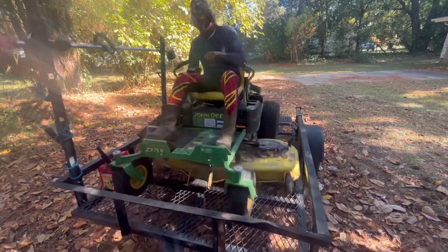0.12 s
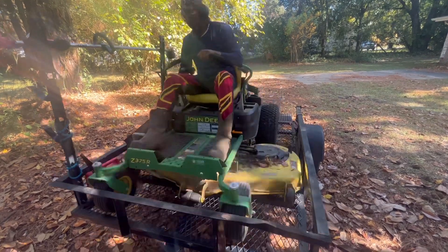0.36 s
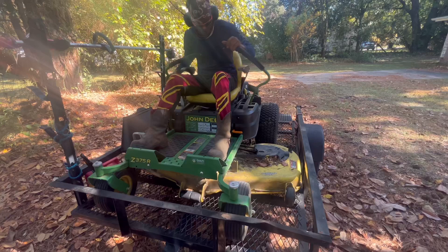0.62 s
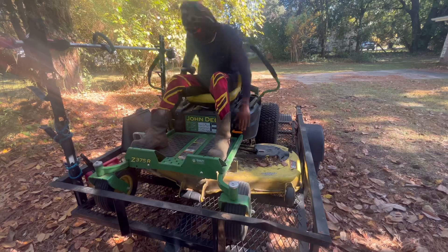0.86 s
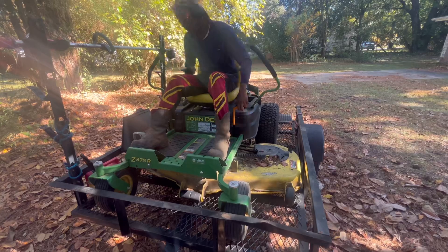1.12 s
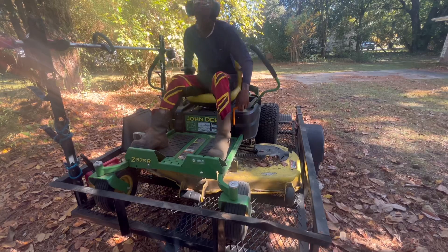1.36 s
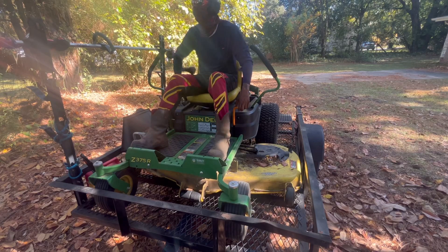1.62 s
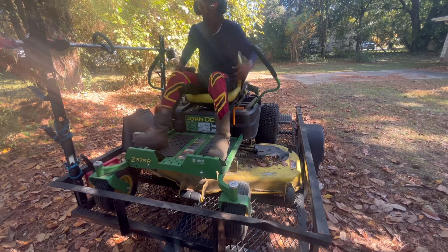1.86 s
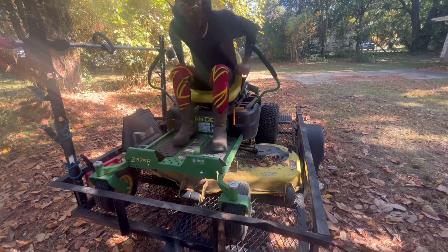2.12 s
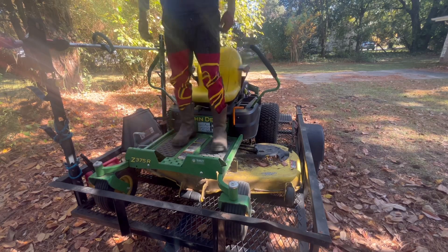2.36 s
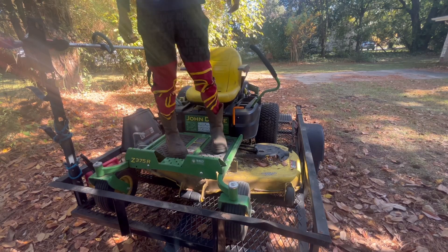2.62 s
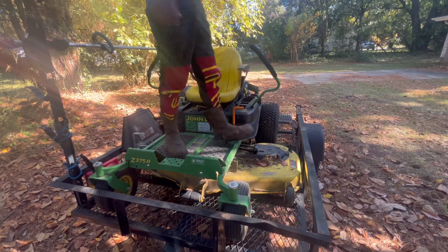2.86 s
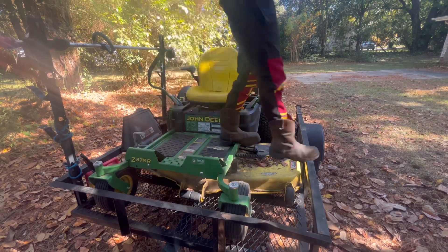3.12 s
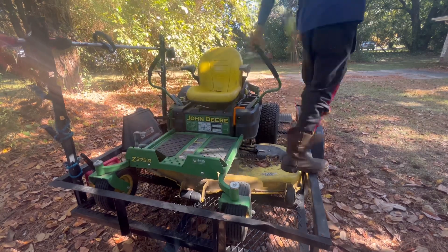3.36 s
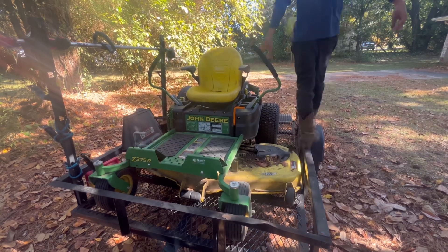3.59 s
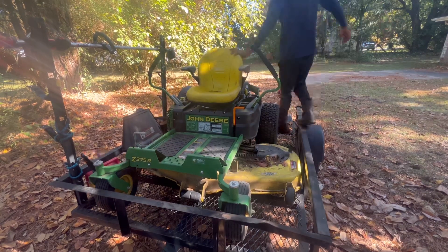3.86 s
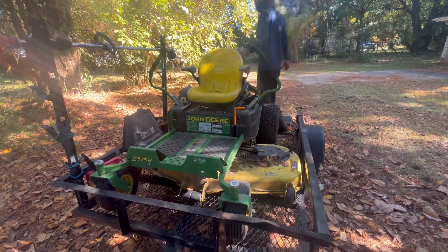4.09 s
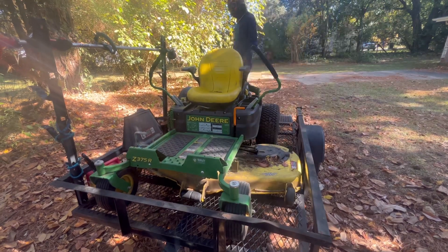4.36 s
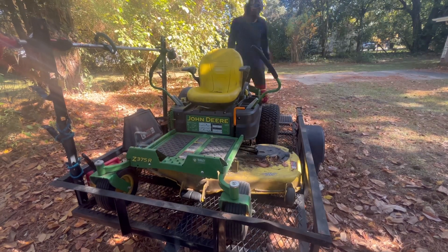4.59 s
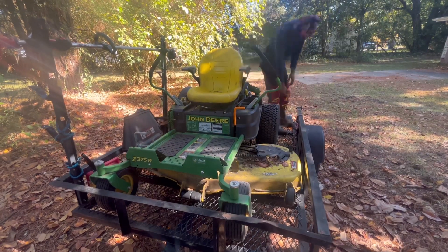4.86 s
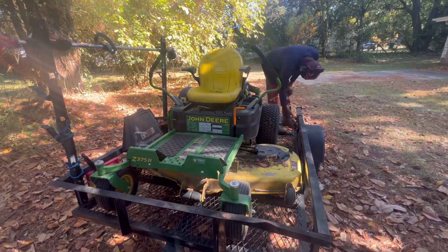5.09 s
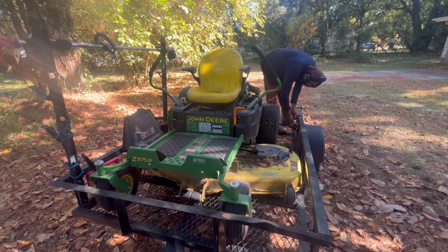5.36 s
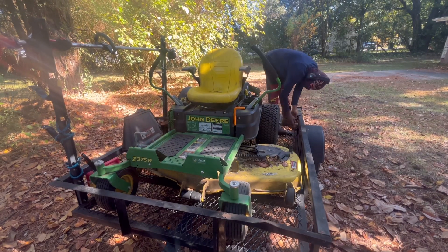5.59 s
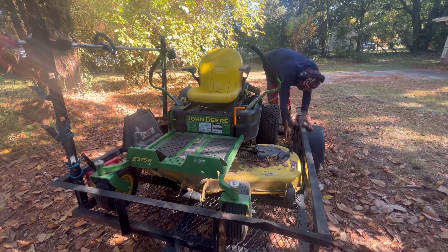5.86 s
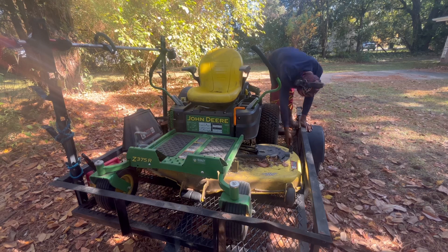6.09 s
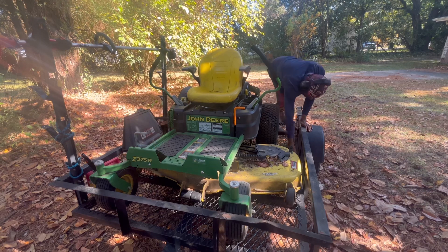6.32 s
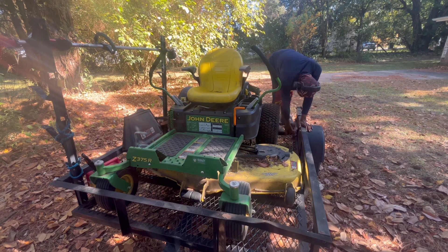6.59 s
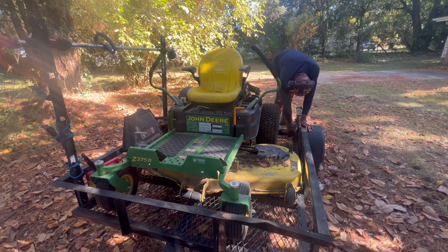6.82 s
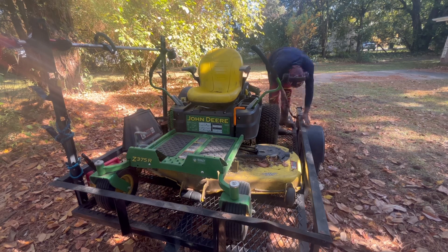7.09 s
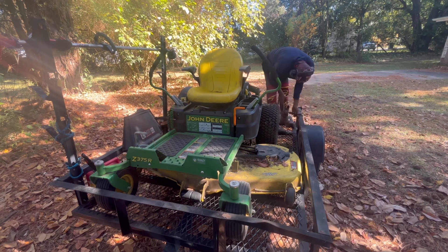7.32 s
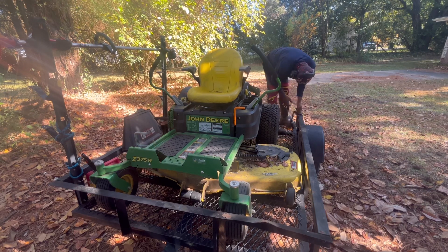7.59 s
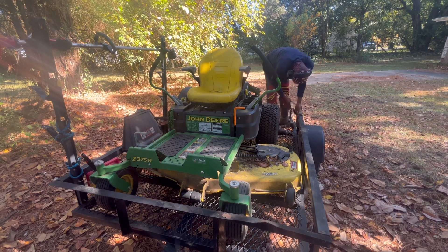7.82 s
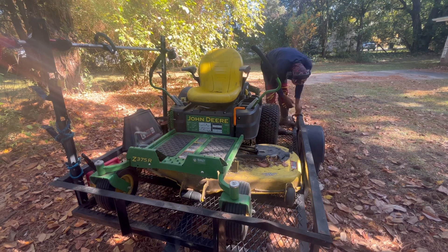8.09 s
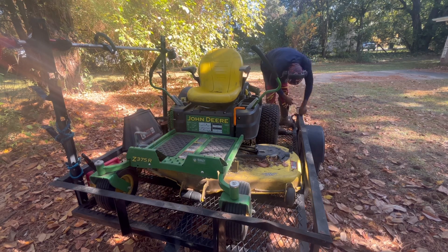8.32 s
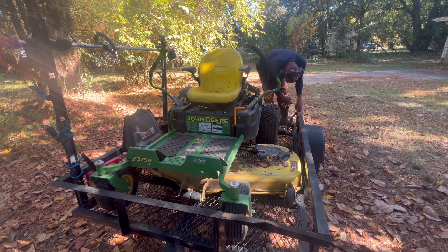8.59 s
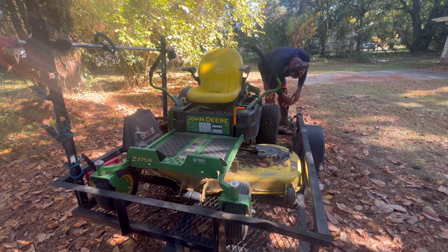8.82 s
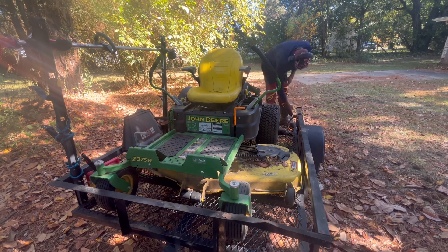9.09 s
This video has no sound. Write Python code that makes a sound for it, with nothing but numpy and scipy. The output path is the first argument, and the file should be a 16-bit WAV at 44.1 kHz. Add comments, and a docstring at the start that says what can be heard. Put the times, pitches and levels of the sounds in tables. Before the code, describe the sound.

Close outdoor stereo pickup in a yard. From 0 to about 1.3 s a mower engine holds a steady, rough buzzing drone near 96 pulses per second, with whining overtones, broadband roar and panel rattle. It is cut at 1.3 s: the pitch falls quickly, breaking by 2 s into separate uneven chugs with loose metallic chatter, stopping around 2.3 s. A quiet gap holds a few faint knocks. From 3.2 to 5.1 s boots climb down over steel: scuffs, hollow low thumps, mesh knocks, tiny rubber squeaks, the hardest bright clanks near 3.95 s, a dull echo tail behind. From 5.1 to 7.5 s only sparse, soft scrapes and ticks. A sharper clink cluster comes at 7.6 s. Faint distant traffic and leaf hiss rise after 7.8 s, a far engine passes with sinking pitch, and one bright clink rings near 9.2 s.

```python
"""In a yard, close by two microphone ports, a ride-on mower stands on a steel mesh trailer. Its engine whines in
multiples of a pulse rate over a noise roar, is switched off and coasts down in ever slower puffs through resonances.
The driver climbs off: boots, strap and hooks scuff, knock and squeak as noise bursts ringing the steel, short blows
and unsteady tones, while the trailer frame booms. Far off, shaped noise makes traffic and leaves swell, a far engine
passes in a few sinking tones, and a dull echo tail answers the trailer."""
import sys
import numpy as np
from scipy import signal
from scipy.fft import rfft, irfft, next_fast_len
from scipy.io import wavfile
from scipy.ndimage import uniform_filter1d, map_coordinates

SR = 44100
rng = np.random.default_rng(int(sys.argv[2]) if len(sys.argv) > 2 else 0)


def wav_record(signal):
    """Record a signal, one row per channel, as 16-bit PCM in the file named by sys.argv[1]."""
    frames = np.transpose(np.atleast_2d(signal))
    bounded = np.clip(frames, -1, 1)
    # unit amplitude maps onto the largest positive 16-bit level
    quanta = np.round(bounded * 32767).astype(np.int16)
    wavfile.write(sys.argv[1], SR, quanta)


def elevation(decibels):
    """Turn decibel levels (scalar or array-like) into linear amplitude ratios."""
    levels = np.asarray(decibels, float)
    return 10 ** (levels / 20)


N = 405719
T = np.arange(N) / SR  # seconds

# Far yard. Each row: time in seconds, traffic level in dB, leaves level in dB.
YARD_LEVELS = [(2.4, -48.5, -53), (3.08, -48, -50.5), (3.6, -53, -57), (4.25, -50.5, -56.5),
               (4.7, -56, -60), (6.2, -56.5, -62.5), (6.55, -53.5, -60), (7.4, -55, -55),
               (7.8, -47.5, -50.5), (8.2, -49, -47), (8.69, -42, -42), (9.2, -40, -42)]
# Spectra of far traffic, leaves and the finest hiss under them. Each row: frequency in Hz, level in dB per Hz.
TRAFFIC_SPECTRUM = [(18, -77.5), (30, -57), (59, -40), (136, -12.5), (171, -8), (202, -0.5), (305, -3.5),
                    (660, -16), (929, -18), (1240, -23), (2200, -30.5), (2860, -54), (4840, -120)]
LEAVES_SPECTRUM = [(900, -30.5), (1600, -25), (2100, -13.5), (3300, -1.5), (4600, -2.5), (7000, -10.5),
                   (9500, -19.5), (13000, -40)]
FINE_SPECTRUM = [(5000, -29.5), (8000, -12.5), (12000, -4), (15500, -3)]
FINE_DB = -14  # over the leaves
# A far engine passes, its pitch sinking. Each row: time in seconds, pulse rate in Hz, levels in dB of the
# third, fourth and sixth multiple.
PASSING_ENGINE = [(7.4, 51.5, -62, -69.5, -58), (7.9, 51.3, -55, -63, -51), (8.4, 51, -54, -56, -60),
                  (8.7, 50.6, -47, -46, -46), (9.0, 49.25, -49, -41, -50), (9.2, 48.3, -49, -44.5, -59.5)]
# Trees and walls answer the trailer.
ECHO_DB, ECHO_T60_S, ECHO_GAP_S = -21, 0.51, 0.03

# The frame booms under shifting weight. Each row: start in seconds, level in dB, 60 dB decay in seconds.
BOOMS = [(2.612, -48, 0.17), (2.691, -53, 0.26), (3.238, -29, 0.14), (3.28, -30, 0.15), (3.389, -43, 0.13),
         (3.569, -46, 0.64), (3.648, -49, 0.17), (3.738, -39.5, 0.29), (3.91, -29.5, 0.25),
         (3.944, -34.5, 0.59), (4.061, -32, 0.46), (4.105, -43, 0.25), (4.235, -31, 0.23),
         (4.397, -30.5, 0.19), (4.638, -46.5, 0.56), (4.791, -40, 0.14), (4.818, -37, 0.33),
         (4.91, -30.5, 0.19), (4.95, -41.5, 0.18), (4.992, -52, 0.27), (5.699, -52, 0.084),
         (5.906, -48.5, 0.18), (6.447, -42, 0.42), (6.675, -42.5, 0.07), (7.598, -43, 0.52)]
PUSH_S = 0.014  # rise of a push
# Resonances of frame, mesh and steel. Each row: frequency in Hz, width in Hz, relative level in dB.
FRAME_MODES = [(209, 36, -4), (250, 22.6, 7), (307.4, 12.7, 2.5), (380, 23.5, 3.5), (490, 31, -10),
               (537, 36, -2.5)]
MESH_MODES = [(600, 270, 2.5), (825, 35, 6), (913, 38, 4.5), (1038, 51, -1.5), (1115, 206, -5.5)]
STEEL_MODES = [(1870, 1100, 0.5), (2654, 170, 5), (3110, 250, 7), (3510, 91, 9.5), (3760, 130, 9),
               (4680, 600, 2.5), (5670, 680, -1), (7410, 420, -2), (8740, 210, -1.5)]
# Spectrum of the rasp on the steel. Each row: frequency in Hz, level in dB per Hz.
RASP_SPECTRUM = [(4500, -11), (7000, 2.5), (10000, 0.5), (14000, 3), (16500, 7.5)]
# Rubbing touches. Each row: start in seconds, clank in dB, knock over clank in dB, rasp over clank in dB,
# slide in seconds.
SCUFFS = [(3.2444, -56, -12, -27, .016), (3.3014, -49, -1, 2.5, 0.031), (3.389, -60, 18, -3, .003),
          (3.4307, -48, -12, 10, 0.017), (3.567, -46.5, -6, 3, 0.0092), (3.636, -45.5, 0, 3.5, 0.013),
          (3.743, -50, 2, -30, 0.0067), (3.905, -48.5, 9.5, 1.5, 0.022), (3.9944, -41, -4, -3.5, 0.012),
          (4.056, -51, 7.5, 3, 0.023), (4.13, -51.5, -11, 1, .013), (4.228, -44, 4.5, -1, 0.025),
          (4.2894, -61, -19, -18, .011), (4.381, -43, 4.5, -5, 0.018), (4.6687, -54, 0, 7, 0.017),
          (4.786, -58, 10.5, -5, 0.025), (4.895, -50, 4.5, -0.5, 0.02), (4.996, -58, -12, -24, 0.011),
          (5.105, -74.5, -19.5, 7.5, 0.13), (5.2465, -61.5, -17, 8.5, 0.032),
          (5.5618, -58.5, -11, -1, 0.038), (5.619, -71, -11, 5.5, 0.064), (5.9094, -70, -16, 1, 0.018),
          (6.3894, -68, -9, 6, 0.02), (6.52, -62.5, -13, 11, 0.013), (6.5435, -59.5, -6, 7, 0.023),
          (6.856, -62.5, 4.5, 9.5, 0.015), (7.6094, -49.5, 0, -14, 0.015), (7.7394, -65, -30, 13.5, 0.022)]
SCUFF_T60_S = 0.056  # base decay, which steel() stretches for each layer
# Sharp blows. Each row: start in seconds, clank in dB, knock over clank in dB, rasp over clank in dB,
# base decay in seconds, which steel() stretches for each layer.
KNOCKS = [(1.897, -40, -15, 10, 0.055), (2.005, -42, 12.5, -10, 0.068), (2.026, -43, -11, 13.5, 0.049),
          (2.533, -52, 3.5, 0, 0.2), (2.659, -50.5, 1.5, 2, 0.45), (3.2325, -32, -1.5, -16, 0.045),
          (3.274, -43.5, 11.5, -20, 0.043), (3.6056, -39, -6, -15, 0.043), (3.643, -45, 1, -4, .04),
          (3.8843, -51, -1, 2.5, 0.24), (3.937, -29, -22, -4.5, 0.15), (3.9693, -23.5, -8, -1.5, 0.05),
          (3.9832, -27, -12, -14, 0.016), (4.108, -48, 6, 0, .11), (4.182, -44, -7, -6.5, 0.18),
          (4.2084, -46, -12, -4, 0.6), (4.243, -58.5, 18, -20, .1), (4.268, -66, 11, -20, 0.046),
          (4.392, -55.5, 10, -20, 0.085), (4.418, -64.5, 15, -20, 0.071), (4.9437, -52.5, -1, -3, 0.16),
          (5.0724, -55.5, -14, 3, 0.18), (6.316, -57, -17, -2, 0.095), (6.358, -63, -19, 18.5, .14),
          (6.461, -66, 13, -3, 0.14), (6.675, -54.5, 0.5, 14, 0.11), (6.69, -72.5, 10, -10, 0.1),
          (6.831, -51, -28, 17.5, 0.16), (7.541, -51.5, 1, 18.5, 0.13), (7.5806, -39.5, -14, 16.5, 0.12),
          (7.591, -60, 15.5, -20, 0.11), (9.179, -45, -10, 14.5, 0.54)]
STRIKE_DB = 14  # the single first contact over the level of the ringing
CRACK_DB, CRACK_T60_S = -10, 0.018  # first crack: level over the ringing blow, base decay
# Rubber squeals on steel. Each row: start in seconds, length in seconds, pitch in Hz, level in dB,
# step from overtone to overtone in dB, overtones under the first in dB.
SQUEALS = [(3.299, 0.012, 2540, -34.5, -1, 6.5), (3.433, 0.024, 895, -38.5, -0.04, 15),
           (3.563, 0.012, 902, -43, -0.06, 13), (3.644, 0.011, 886, -40, 0, 14)]
# Metal ringing or settling. Each row: start in seconds, length in seconds, pitch in Hz, level in dB.
METAL_TONES = [(2.366, 0.01, 1150, -46), (2.378, 0.27, 234, -50.5), (2.71, 0.13, 1180, -57),
               (3.081, 0.00085, 1576, -36), (3.233, 0.0017, 1010, -29.5), (3.275, 0.0045, 990, -32.5),
               (3.44, .025, 1560, -51), (3.565, .006, 3800, -43), (3.605, 0.003, 3280, -37),
               (3.607, 0.016, 1223, -45), (3.655, .008, 3650, -54), (3.967, 0.027, 3720, -44),
               (4.176, .008, 3060, -41.5), (4.218, .02, 3300, -40), (4.277, 0.013, 3100, -43),
               (4.387, .01, 3510, -46), (4.687, 0.039, 3100, -55), (4.903, .006, 3440, -44),
               (4.992, 0.08, 247, -45.5), (5.072, .025, 5350, -55.5), (7.59, 0.0086, 585, -44),
               (7.624, 0.012, 540, -39.5), (7.645, .012, 545, -42)]

# A loose bracket chatters as the machine shudders to rest. Each row: time in seconds, level in dB.
CHATTER = [(1.9, -60), (2.04, -42), (2.07, -41), (2.14, -41), (2.25, -43), (2.31, -47), (2.35, -56),
           (2.4, -90)]
# Its ring. Each row: frequency in Hz, width in Hz, relative level in dB.
BRACKET_MODES = [(2617, 130, 0), (1460, 200, -4)]

# The shaft, governed and then coasting. Each row: time in seconds, pulse rate in Hz.
SPEED = [(0, 96.35), (.6, 97.1), (1.275, 96.37), (1.35, 88.8), (1.444, 81.2), (1.608, 74.5), (1.652, 68.77),
         (1.776, 53.55), (1.852, 45.9), (2.0, 32.54), (2.094, 28.2), (2.16, 24.8), (2.36, 21.16)]
HUNT = 0.001  # share by which the governor lets the speed wander
OFF_S, FADE_S = 1.276, 2.258  # the ignition is cut; the coasting layers begin to fade
FADE_DB_S = 93.5  # how fast the coasting layers fall silent once they begin to fade
# Whine while firing, then without firing. Each row: multiple of the pulse rate, level in dB.
WHINE = [(1, -30), (2, -4), (3, -2), (4, -14), (5, -9), (6, -13), (7, -19), (8, 0), (9, -8), (10, -1),
         (11, -3), (12, -8), (13, -13.5), (14, -15), (16, -13), (18, -20), (19, -13), (20, -17), (21, -13),
         (22, -16), (24, -20), (27, -20), (30, -18), (32, -15.5), (33, -21), (34, -19), (35, -21),
         (36, -17), (37, -21), (39, -21), (41, -18), (44, -23)]
COAST = [(2, -4), (4, -23), (5, -10.5), (6, -9.5), (7, -13), (8, -5.5), (9, -21), (10, -8.5), (11, -6),
         (12, -8), (13, -7), (14, -9.5), (15, -13)]
WHINE_DB, WHINE_DIES_DB_S = -22, 700  # while firing; fall after the cut
COAST_DB, COAST_GROWS = -25, 1.8  # coasting whine at full speed; dB gained per dB of speed
# Two lists, for the fortieth and forty-eighth multiple drifting in and out. Each row: time in seconds, level in dB.
DRIFTING = [(0, -11), (.3, -12), (.5, -16), (1.05, -15), (1.15, -13), (1.3, -17)], [(0, -21), (.3, -17),
            (.4, -10), (.58, -10), (.65, -20), (1.3, -22)]
# How ragged the multiples are, worst just after the cut. Each row: time in seconds, extra waver in dB.
RAGGED = [(1.275, 0), (1.3, 4), (1.43, 3.5), (1.48, .7), (1.7, .9), (1.9, 2)]
TWIN_GAP, TWIN_SIZE = 0.385, 0.93  # second burst of each period: share of the period, size over the first
SWEEP = 0.014  # each burst sweeps upward: phase lag in turns per squared multiple
# The third multiple booms while it slides through this resonance, and kicks once as the ignition is cut.
BOOM_HZ, BOOM_WIDTH_HZ, BOOM_DB = 213.5, 44, -16.5
KICK_DB, KICK_DIES_DB_S = -16.5, 151
# Puffs within one pulse period. Each row: share of the period, level in dB.
PUFFS = [(0, -1), (.39, 1), (0.741, 0.5)]
PUFF_FIRING_DB, PUFF_DB, PUFF_GROWS = -48, -22, 0.48  # firing; coasting; dB gained per dB of speed
# The last uneven chugs, once the shaft no longer turns smoothly. Each row: time in seconds, pulse strength in dB.
CHUGS = [(1.958, 4), (1.974, 8), (1.987, 7), (2.005, -2), (2.019, 6), (2.036, 3), (2.053, 4.5),
         (2.069, 6.5), (2.090, 3.5), (2.108, -3), (2.132, 3.5), (2.150, 4), (2.166, 1), (2.18, 1.5),
         (2.200, 0), (2.221, -4), (2.236, 2.5), (2.262, -2.5), (2.289, -3.5), (2.311, -4), (2.321, -8),
         (2.358, -8)]
# Resonances of the exhaust pipe, of the rattling panels, and of loose parts that each puff jolts.
# Each row: frequency in Hz, width in Hz, relative level in dB.
PIPE_MODES = [(223, 52, 0), (345, 60, 1.5), (640, 150, -6.5), (843, 220, -4.5), (1150, 170, -5.5)]
PANEL_MODES = [(1515, 280, 1.5), (2520, 590, -4), (2920, 130, 0.5), (3376, 140, 0), (3940, 300, 0.5),
               (4640, 240, -3), (5980, 200, -1.5), (7180, 220, -0.5)]
LOOSE_MODES = [(752, 230, -1), (1102, 250, 0), (1470, 190, 2.5), (1980, 400, -2), (2650, 110, 1.5),
               (3030, 220, 0), (3720, 190, -3), (4430, 500, -12)]
JOLT_BELOW_HZ = 45  # puffs faster than this jolt the loose parts less
# Spectrum of the roar. Each row: frequency in Hz, level in dB per Hz.
ROAR_SPECTRUM = [(35, -64), (60, -29), (120, -26), (200, -14.5), (330, -13.5), (550, -16.5), (800, -11),
                 (1100, -5.5), (1500, -18.5), (2200, -15), (3300, -14), (5000, -18.5), (9000, -20.5),
                 (15500, -26.5)]
ROAR_DB, ROAR_GROWS, ROAR_SAGS_DB_S = -22.5, 1.25, 2.5  # start; dB per dB of speed; sag up to the cut
# Panel rattle. Each row: time in seconds, level in dB.
RATTLE = [(0, -30.5), (.9, -36.5), (1.3, -31.5), (1.62, -38), (1.78, -49), (2.0, -46.5), (2.1, -46),
          (2.3, -44)]

# Likeness of the two ports for close and far sounds. Each row: frequency in Hz, left-right likeness.
ALIKE_NEAR = [(60, 0.6), (150, 1), (500, 0.87), (1000, 1), (2400, 0.19), (6000, 0.25), (15000, 0.072)]
ALIKE_FAR = [(60, .7), (150, 0.67), (500, 0.94), (1000, 0.33), (2400, 0.28), (6000, 0.1), (15000, 0.14)]
# Left port against right. Each row: frequency in Hz, left over right in dB.
LEAN = [(60, -4.5), (130, 4), (290, 2.5), (640, 3), (1410, -2.5), (3100, 0), (6820, -1.5), (15000, 3)]
# Phase between the ports. Each row: frequency in Hz, lead of the left in radians.
LEAD = [(30, 0), (250, -.05), (500, -.6), (1000, -.65), (1550, -1), (1850, -1.5), (2100, -3.8),
        (2760, -4.8), (3100, -5.6), (3880, -6.3), (16000, -6)]
# Microphone response. Each row: frequency in Hz, gain in dB.
MIC_RESPONSE = [(30, -36), (70, -4), (130, -3), (200, -0.5), (15600, 0), (15900, -22), (17000, -40)]
# Air moving at the ports. Each row: frequency in Hz, level in dB per Hz.
AIR_SPECTRUM = [(20, -30), (45, -14), (70, -17.5), (100, -3.5), (150, -4), (250, -43)]


def unit(x):
    """Scaled to rms 1."""
    return x / np.sqrt(np.mean(x ** 2) + 1e-20)


def along(points, hz):
    """(Hz, value) points read off on a log frequency axis."""
    f, v = np.transpose(points)
    return np.interp(np.log(hz + 1), np.log(f + 1), v)


def curves(rows):
    """One value per sample for each column after the time."""
    s, *cols = np.transpose(rows)
    return [np.interp(T, s, c) for c in cols]


def wobble(rate, count=N):
    """A smooth random curve with rate knots a second."""
    return map_coordinates(rng.standard_normal(int(N * rate / SR) + 4), [T[:count] * rate])


def filtered(x, response):
    """x times a complex response of frequency."""
    m = next_fast_len(N + SR // 2)
    return irfft(rfft(x, m) * response(np.fft.rfftfreq(m, 1 / SR)), m)[..., :N]


def modes(table):
    """Causal response of damped resonances, scaled so that white noise keeps its rms."""
    def gain(f):
        total = 0
        for k, (centre, width, db) in enumerate(table):
            damping = 1j * f * width
            total = total + (-1) ** k * elevation(db) * damping / (centre * centre - f * f + damping)
        return total

    return lambda f: gain(f) / np.sqrt(np.mean(np.abs(gain(f)) ** 2))


def rush(spectrum, patchy_db):
    """Two unrelated noises, together of rms 1, under the same patches of random gain in time and frequency."""
    z = signal.stft(rng.standard_normal((2, N)), nperseg=512)[2]
    field = uniform_filter1d(rng.standard_normal(z.shape[1:]), size=6, axis=0)
    field = uniform_filter1d(field, size=14, axis=1)
    pair = signal.istft(z * elevation(patchy_db * unit(field)), nperseg=512)[1][:, :N]
    return unit(filtered(pair, lambda hz: elevation(along(spectrum, hz))))


def strokes(rows):
    """Envelope of touches (s, dB, rise s, hold s, t60 s): swell, stay, then die away."""
    out, t = np.zeros(N + SR), T[:SR // 2]
    for s, db, rise, hold, t60 in rows:
        fall = 60 * np.maximum(t - rise - abs(hold), 0) / max(t60, .01)
        out[round(s * SR):][:len(t)] += elevation(db - fall) * np.minimum(t / max(rise, 1e-4), 1)
    return out[:N]


def ports(pair, alike):
    """The first sound reaches both ports alike, the second with opposite signs; the housing shifts left against right."""
    def split(hz):
        turn = np.arccos(np.clip(along(alike, hz), 0, 1)) / 2
        return np.array([np.cos(turn), np.sin(turn)])

    def housing(hz):
        half = elevation(along(LEAN, hz) / 2) * np.exp(.5j * along(LEAD, hz))
        return np.array([half, 1 / half])

    mid, side = filtered(pair, split)
    return filtered(np.array([mid + side, mid - side]), housing)


def yard():
    """Far off: noise for traffic and leaf hiss, and a passing engine as three multiples of its pulse rate."""
    traffic_db, leaves_db = curves(YARD_LEVELS)
    traffic = elevation(traffic_db + 0.7 * wobble(5.2)) * rush(TRAFFIC_SPECTRUM, patchy_db=1.2)
    rate, *levels = curves(PASSING_ENGINE)
    for k, db in zip((3, 4, 6), levels):
        turns = np.cumsum(k * rate * (1 + 0.0064 * wobble(9.3))) / SR
        traffic[0] += elevation(db + 1.5 * wobble(7.8)) * np.sin(2 * np.pi * turns)
    leaves = elevation(leaves_db + .6 * wobble(5)) * rush(LEAVES_SPECTRUM, patchy_db=1.2)
    return traffic + leaves + elevation(leaves_db + FINE_DB) * rush(FINE_SPECTRUM, patchy_db=3)


def echo(pair):
    """A soft dull tail of decaying noise comes back after a short gap."""
    decay = rng.standard_normal((2, SR)) * elevation(-60 * T[:SR] / ECHO_T60_S)
    tail = filtered(np.pad(decay, ((0, 0), (0, N - SR))), lambda hz: 1 / (1 + 1j * hz / 2500))
    tail = tail[:, :SR] / np.linalg.norm(tail[0])
    tail = np.pad(tail, ((0, 0), (round(ECHO_GAP_S * SR), 0)))
    return elevation(ECHO_DB) * signal.fftconvolve(pair[:1], tail, axes=1)[:, :N]


def frame():
    """Soft pushes of noise shake the low resonances of the trailer frame."""
    rows = [(s, db, PUSH_S, 0, t60) for s, db, t60 in BOOMS]
    return filtered(rng.standard_normal((2, N)) * strokes(rows), modes(FRAME_MODES))


def steel(s, db, knock_db, rasp_db, t60, slide, rise, grit_db):
    """Bursts of gritty noise ring the steel (clank) and the mesh (knock) and rasp above them."""
    def touch(level_db, ring):
        grit = rng.standard_normal((2, N)) * elevation(grit_db * (wobble(300) + 1.1 * wobble(1500)))
        rows = np.transpose([s - rise / 2, level_db, rise + 0 * s, slide + 0 * s, ring * t60])
        return grit * strokes(rows)

    clank = filtered(touch(db, 1.56), modes(STEEL_MODES))
    knock = filtered(touch(db + knock_db, 2.07), modes(MESH_MODES))
    rasp = filtered(touch(db + rasp_db, 0.65), lambda hz: elevation(along(RASP_SPECTRUM, hz)))
    return clank + knock + rasp


def scuffs():
    """A rub swells, lasts while the sole or strap slides, and fades."""
    *touch, slide = np.transpose(SCUFFS)
    rise = np.clip(.3 * slide, .002, .01)
    return steel(*touch, SCUFF_T60_S + 0 * slide, slide, rise, grit_db=4.6)


def knocks():
    """A blow starts at once with one hard contact and a crack, and dies away."""
    s, db, *colour, t60 = np.transpose(KNOCKS)
    contact = np.zeros((2, N))
    contact[:, np.round(s * SR).astype(int)] = elevation([db + STRIKE_DB, db + STRIKE_DB + colour[0]])
    strike = filtered(contact[0], modes(STEEL_MODES)) + filtered(contact[1], modes(MESH_MODES))
    blow = steel(s, db, *colour, t60, slide=0.00057, rise=0.000307, grit_db=1.1)
    crack = steel(s, db + CRACK_DB, *colour, CRACK_T60_S + 0 * s, slide=.0004, rise=0.00022, grit_db=0.5)
    return np.array([strike, 0 * T]) + blow + crack


def squeal(s, length, hz, db, step_db=0, under_db=0, count=1):
    """An unsteady tone; its overtones come and go each in its own way."""
    n = SR // 4
    start = round(s * SR)
    turns = np.cumsum(hz * (1 + .01 * wobble(120, count=n))) / SR
    out = np.zeros(N)
    for k in range(count):
        shimmer_db = (3 + 2 * (k > 0)) * wobble(70, count=n)
        level = elevation(k * step_db - under_db * (k > 0) + shimmer_db)
        smear = .5 * np.sqrt(k) * wobble(500, count=n)  # higher overtones blur into noise
        out[start:start + n] += level * np.sin(2 * np.pi * (k + 1) * turns + smear)
    fade = min(.05, 8 * length) + 0.54 * length
    return out * strokes([(s, db, min(.006, length), length, fade)])


def squeaks():
    """Stick-slip squeals with a ladder of overtones, and single tones of metal."""
    ladders = sum(squeal(*row, count=int(15500 / row[2])) for row in SQUEALS)
    tones = sum(squeal(*row) for row in METAL_TONES)
    return np.array([ladders + tones, 0 * T])


def bracket():
    """Quick uneven taps ring the loose bracket."""
    taps = rng.standard_normal((2, N)) * elevation(4 * wobble(70) + 2.5 * wobble(400))
    ring = modes(BRACKET_MODES)
    level = elevation(curves(CHATTER)[0]) * (T > CHATTER[0][0])
    return level * unit(filtered(filtered(taps, ring), ring))


def engine_levels(rate):
    """Each layer's level follows the ignition and the speed of the shaft."""
    slow_db = 20 * np.log10(rate / rate[0])
    after = np.maximum(T - OFF_S, 0)
    fade_db = FADE_DB_S * np.maximum(T - FADE_S, 0)
    cut = np.clip(after / .02, 1e-3, 1)  # coasting takes over within a few strokes
    cut_db = 20 * np.log10(cut)
    whine_db = WHINE_DB - WHINE_DIES_DB_S * after
    coast_db = COAST_DB + COAST_GROWS * slow_db + cut_db - fade_db
    puff_db = PUFF_FIRING_DB + cut * (PUFF_DB - PUFF_FIRING_DB) + PUFF_GROWS * slow_db - fade_db
    roar_db = ROAR_DB + ROAR_GROWS * slow_db - ROAR_SAGS_DB_S * np.minimum(T, OFF_S) - fade_db
    rattle_db = curves(RATTLE)[0] - fade_db
    boom = elevation(BOOM_DB) / (1 + (2 * (3 * rate - BOOM_HZ) / BOOM_WIDTH_HZ) ** 2)
    kick = elevation(KICK_DB - KICK_DIES_DB_S * after)
    third = (boom + kick) * elevation(cut_db - fade_db)
    return whine_db, coast_db, puff_db, roar_db, rattle_db, third


def engine_whine(cycles, firing, whine_db, coast_db, third):
    """Multiples of the pulse rate, phased as two upward-sweeping bursts a period, each wavering on its own."""
    n = 3 * SR  # the whine has died by then
    unsteady_db = curves(RAGGED)[0][:n]

    def partial(k, db):
        # the high multiples waver more, and those above the third more still once the firing stops
        waver_db = unsteady_db * (k > 3) * wobble(35, count=n) + (.3 + k / 24) * wobble(12, count=n)
        twin = np.angle(1 + TWIN_SIZE * np.exp(-2j * np.pi * k * TWIN_GAP)) - 2 * np.pi * SWEEP * k ** 2
        turns = cycles[:n] + 0.003 * unsteady_db * wobble(45, count=n)
        return -elevation(db + waver_db) * np.cos(2 * np.pi * k * turns + twin)

    def stack(table):
        return np.pad(sum(partial(k, db) for k, db in table), (0, N - n))

    drifting = [(k, curves(rows)[0][:n]) for k, rows in zip((40, 48), DRIFTING)]
    whine = elevation(whine_db) * stack(list(WHINE) + drifting) * (1 + .12 * firing)
    whine += elevation(coast_db) * stack(COAST) * (1 + .3 * firing)
    return whine + third * (1 + .25 * firing) * stack([(3, 0)])


def puff_pulses(cycles, rate, puff_db):
    """Several pulses in each period, more uneven as the shaft slows, then the last chugs one by one."""
    puffs = np.zeros(N)
    smooth_end = round((CHUGS[0][0] - .01) * SR)
    for offset, db in PUFFS:
        at = np.flatnonzero(np.diff(np.floor(cycles - offset)[:smooth_end]) > 0)
        uneven_db = 1200 / rate[at] ** 2 * rng.standard_normal(len(at))
        puffs[at] += elevation(db + uneven_db) * np.sqrt(SR / rate[at])
    puffs *= -elevation(puff_db)
    s, db = np.transpose(CHUGS)
    puffs[np.round(s * SR).astype(int)] = -elevation(db)
    return puffs


def pipe(hz):
    """Pipe resonances without the deep bass; gas leaves the pipe without a sharp edge."""
    return modes(PIPE_MODES)(hz) * (1j * hz / (130 + 1j * hz)) ** 5 / (1 + (hz / 800) ** 2) ** 2


def panel_rattle():
    """Unevenly shaken noise rings the panels, filtered twice for narrow resonances."""
    shake = rng.standard_normal((2, N)) * elevation(1.2 * wobble(150) + 2.0 * wobble(25.3))
    ring = modes(PANEL_MODES)
    return unit(filtered(filtered(shake, ring), ring))


def loose_parts(puffs, rate):
    """Each puff jolts loose parts with a short decaying burst of noise."""
    blows = np.abs(puffs) * np.minimum(JOLT_BELOW_HZ / rate, 1) ** 2
    decay = elevation(-60 * T[:SR // 20] / 0.036)
    jolt = np.convolve(blows, decay)[:N] * rng.standard_normal((2, N))
    ring = modes(LOOSE_MODES)
    return elevation(-47) * filtered(filtered(jolt, ring), ring)


def engine():
    """Whine, puffs through the pipe, roar and rattle all follow the turning of one shaft."""
    rate, = curves(SPEED)
    whine_db, coast_db, puff_db, roar_db, rattle_db, third = engine_levels(rate)
    cycles = np.cumsum(rate * (1 + .0006 * wobble(14) + HUNT * wobble(6))) / SR
    firing = np.cos(2 * np.pi * cycles / 4)  # one firing stroke in four pulses
    whine = engine_whine(cycles, firing, whine_db, coast_db, third)
    puffs = puff_pulses(cycles, rate, puff_db)
    gate = 1 + 0.094 * np.cos(2 * np.pi * cycles) + 0.017 * firing
    out = elevation(roar_db) * gate * rush(ROAR_SPECTRUM, patchy_db=1.5)
    out += elevation(rattle_db) * gate * panel_rattle()
    out[0] += filtered(whine, lambda hz: hz ** 6 / (hz ** 6 + 105 ** 6))  # no whine in the deep bass
    out[0] += filtered(puffs, pipe)
    return out + loose_parts(puffs, rate)


def scene():
    """Mower and trailer close by, the yard and the echo far off."""
    trailer = frame() + scuffs() + knocks()
    far = ports(yard() + echo(trailer), ALIKE_FAR)
    return far + ports(trailer + squeaks() + bracket() + engine(), ALIKE_NEAR)


def low_pass(x):
    """Removes everything above the highest recorded frequency."""
    return signal.sosfilt(signal.butter(12, 16850, fs=SR, output="sos"), x)


def record(dry):
    """A small microphone drops the deep bass and the top; a little air rumbles at its ports."""
    heard = filtered(dry, lambda hz: elevation(along(MIC_RESPONSE, hz)))
    heard = heard + elevation(-73.5) * rush(AIR_SPECTRUM, patchy_db=-2.0)
    return low_pass(heard)


dry = scene()
out = record(dry)
wav_record(out)
```